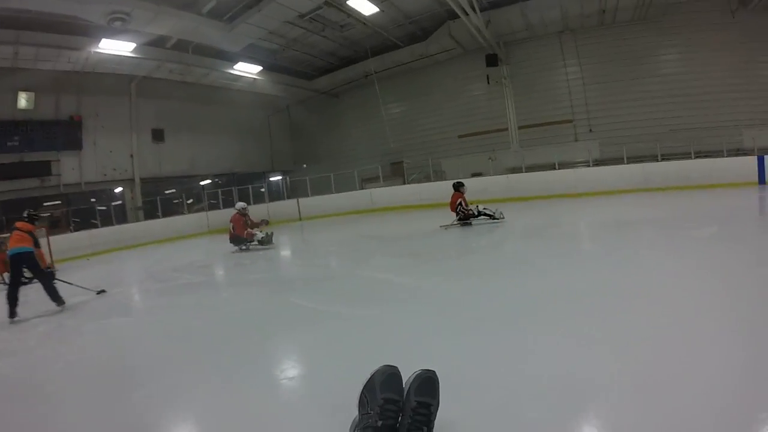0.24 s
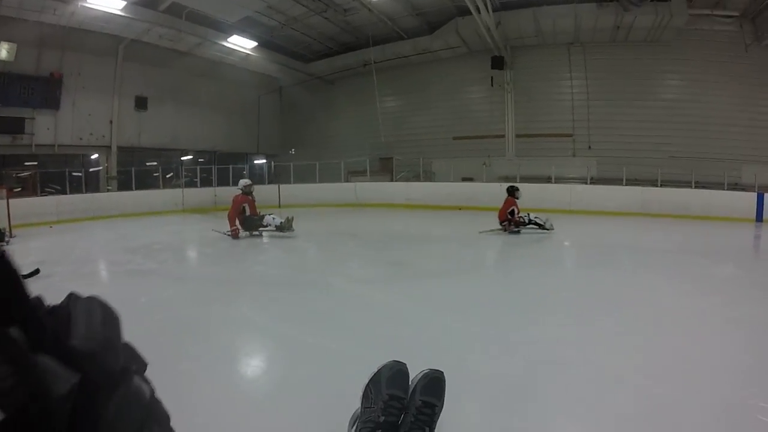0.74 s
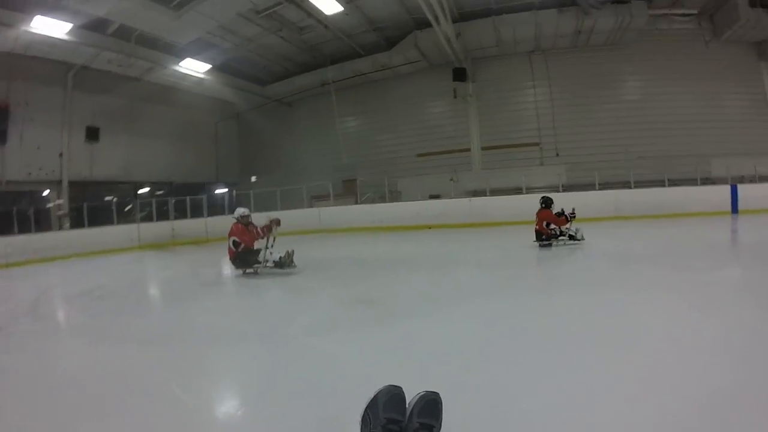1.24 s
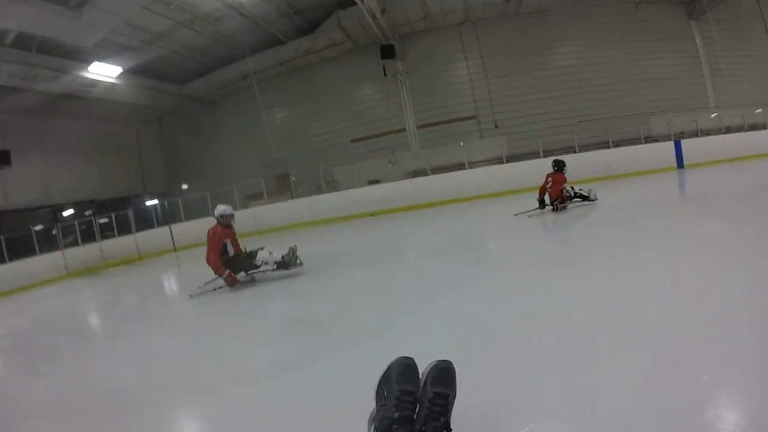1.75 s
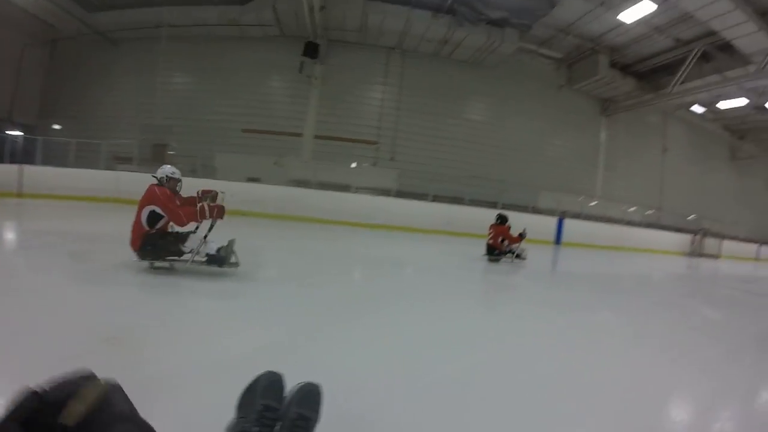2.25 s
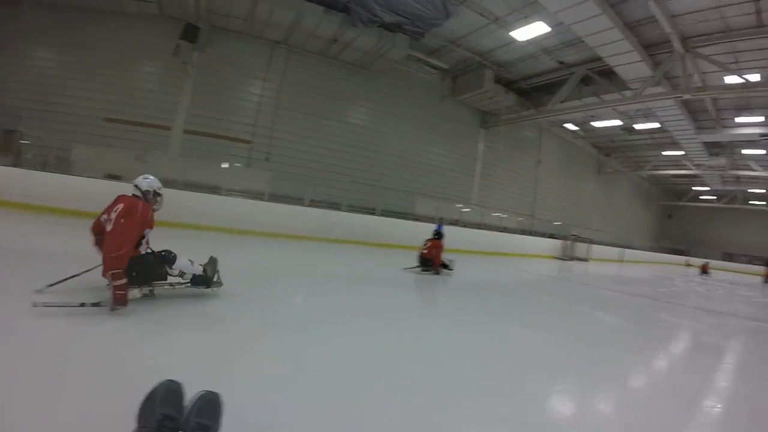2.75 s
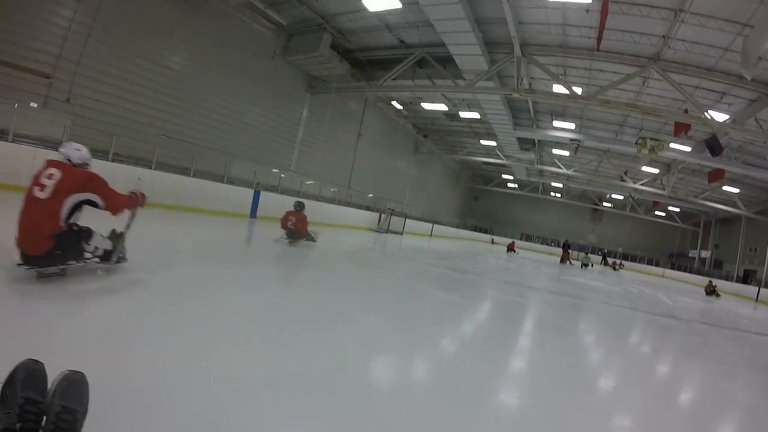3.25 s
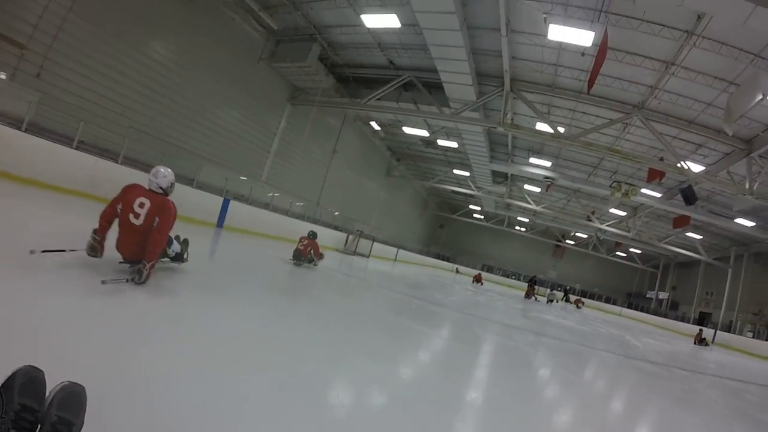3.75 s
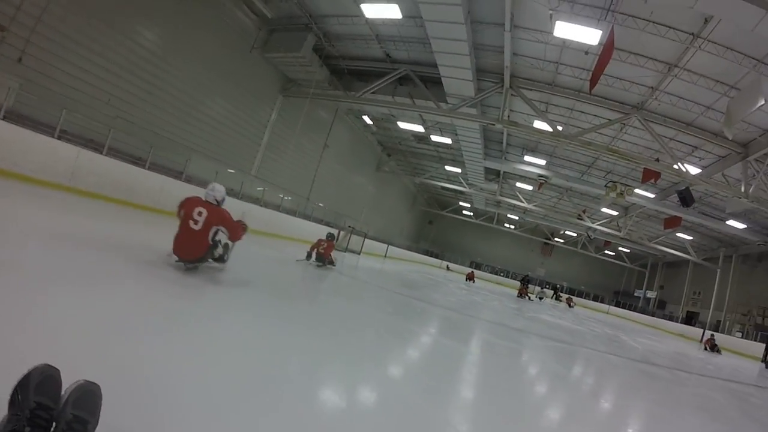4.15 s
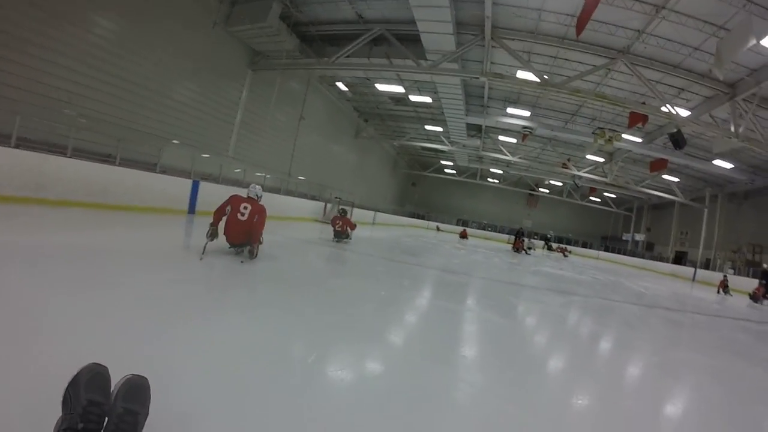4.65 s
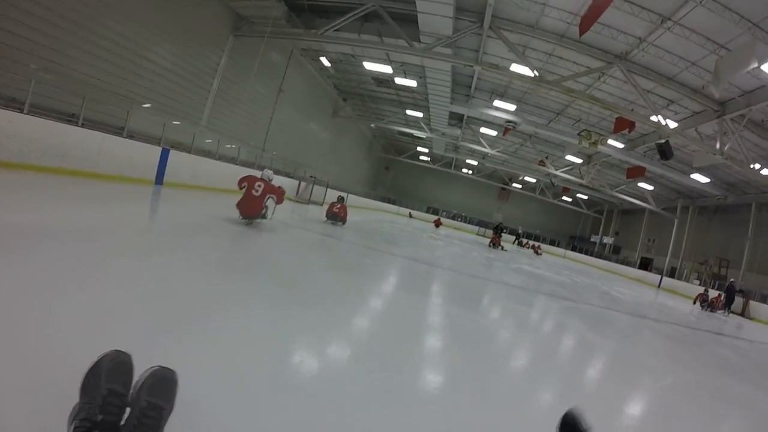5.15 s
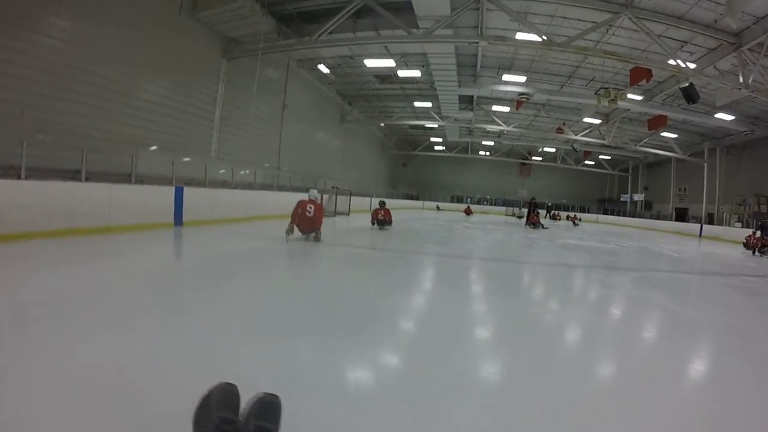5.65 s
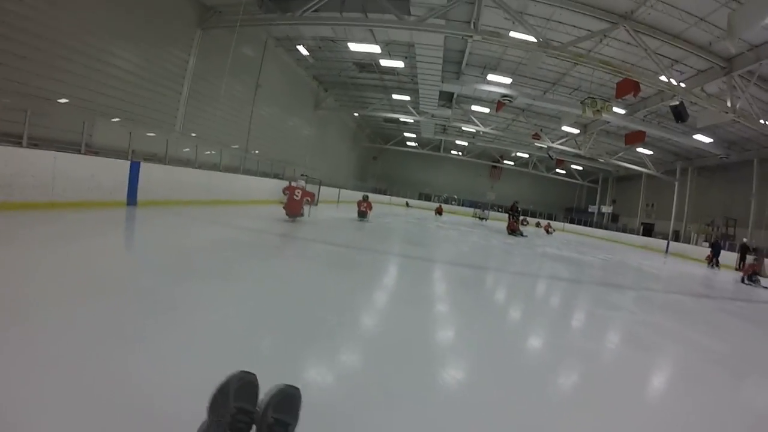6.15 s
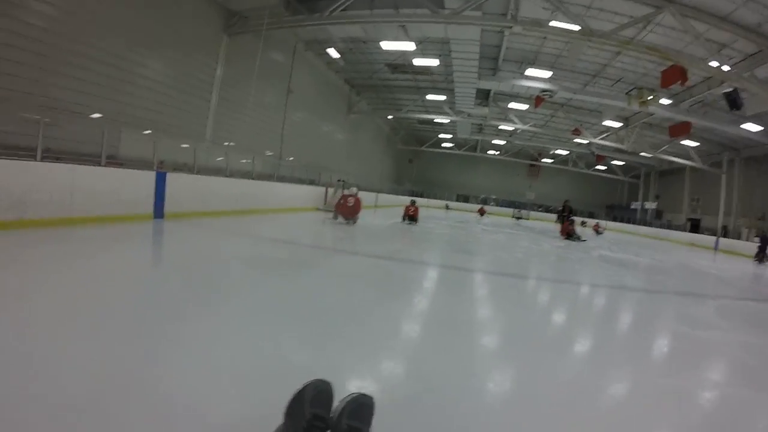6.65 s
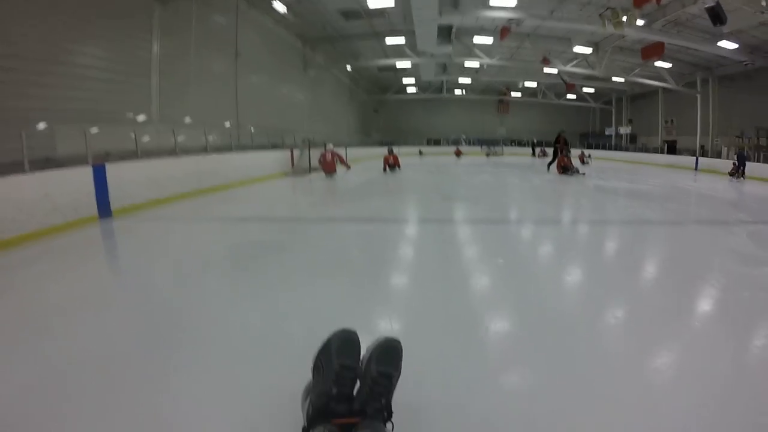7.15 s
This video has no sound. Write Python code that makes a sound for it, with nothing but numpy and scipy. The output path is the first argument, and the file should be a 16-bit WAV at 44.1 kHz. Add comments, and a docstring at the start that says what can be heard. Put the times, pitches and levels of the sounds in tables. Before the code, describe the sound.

From a hockey sled on indoor ice, blades hiss and scrape over a low shuddering rumble, with pick clicks, seat knocks and two heavy thumps.

```python
"""Hockey sled on indoor ice

Heard from the sled. Noise and random ice fractures, filtered, make the blades' hiss, crackle and scrape;
a wandering low sine makes the frame's shudder. Picks click and steel chips the ice as noise bursts in resonators;
the seat knocks and two heavy jolts thump as decaying sines. Shaped noise is the faint air of the hall,
and a decaying noise tail echoes the picks."""
import sys
import numpy as np
from scipy import signal
from scipy.fft import rfft, irfft
from scipy.io import wavfile
from scipy.ndimage import uniform_filter1d, map_coordinates

SR = 44100
rng = np.random.default_rng(int(sys.argv[2]) if len(sys.argv) > 2 else 0)


def store_wav(level_fs):
    """Save 16-bit WAV to argv[1]."""
    pcm = np.round(np.clip(np.atleast_2d(level_fs), -1, 1) * 32767)
    wavfile.write(sys.argv[1], SR, pcm.T.astype(np.int16))


N = 326340
TIME = np.arange(N) / SR  # seconds

# Steady coasting. Each row: time in seconds, glide level in dB, ice dust level in dB,
# mean sway level in dB.
COAST = [(0, -46, -52, -36), (.35, -53, -59.5, -39), (1.3, -48, -57, -34), (1.68, -52, -53.5, -40),
         (2.2, -51, -59, -34.5), (3.25, -47.5, -59, -40), (3.9, -49, -55, -31), (4.7, -44.5, -51.5, -37),
         (5.17, -48.5, -60, -44), (5.6, -45.5, -55, -36), (6.1, -44.5, -50, -30), (6.5, -44.5, -55.5, -36),
         (7.4, -51.5, -56, -41.5)]
# Strokes press the blades into the ice. Each row: start in seconds, hold end after start in seconds,
# glide level in dB, ice dust level in dB.
STROKES = [(0, 0.39, -51.5, -64), (0.607, 0.28, -78, -56.5), (0.963, 0.091, -43.5, -52.5),
           (1.451, 0.13, -53, -67), (1.694, 0.48, -49.5, -54), (2.376, 0.31, -62, -54),
           (2.75, 0.61, -51.5, -57), (3.456, 0.11, -45, -57), (3.787, 0.35, -45, -49.5),
           (4.402, 0.25, -51, -52), (5.281, 0.22, -61, -52.5), (5.705, 0.083, -43.5, -55),
           (5.995, 0.096, -42.5, -69), (6.848, 0.11, -54, -55.5), (7.241, 0.1, -49, -53.5)]
# Edges bite sideways and the skid runs out. Each row: start in seconds, rasp level in dB, t60 in seconds.
SKIDS = [(.97, -45.5, 0.37), (3.82, -50.5, 3.7), (4.45, -50, 1.7), (5.715, -47, 0.56), (6.03, -41.5, 4.7),
         (6.06, -43.5, 0.6)]
# Frame resonances. Each row: pitch in Hz, width in Hz, gain in dB.
FRAME_RINGS = [(1481, 186, 0), (1659, 210, -0.5), (2290, 174, -2), (2597, 170, -4), (3136, 340, -2.5),
               (4335, 194, -4), (5740, 1900, -30)]
# Filter shape of the ice dust. Each row: frequency in Hz, relative gain in dB.
SPRAY_COLOUR = [(2500, -1), (3900, -1.5), (4400, 9.5), (4900, -3.5), (5900, 4), (6700, -6.5), (7400, -10),
                (8000, -18), (10000, -19), (12000, -30.5), (15000, -78)]
# Filter shape of the sideways rasp. Each row: frequency in Hz, relative gain in dB.
SCRAPE_COLOUR = [(250, -3.5), (550, -5), (900, 1), (1250, -0.5), (1750, -2.5), (2400, 4.5), (3300, -9),
                 (5000, -16), (9000, -55)]
# Pitch of the frame's sway. Each row: time in seconds, mean pitch in Hz, rms wander in Hz.
SWAY_PITCH = [(0, 56.15, 3.77), (1.1, 51, 2.84), (3.1, 51.66, 2.8), (3.5, 50.23, 6.47), (5.1, 50.13, 7.1),
              (6.1, 40.44, 7.2), (6.6, 47.94, 6.9), (7.4, 44.4, 4.3)]
# Bumps set the frame swinging. Each row: start in seconds, hold end after start in seconds, sway level in dB.
BUMPS = [(0.147, 0.085, -27.5), (0.452, 0.13, -27), (0.682, 0.11, -25), (0.873, 0.064, -31),
         (0.988, 0.086, -19.5), (1.752, 0.053, -26), (1.9, 0.075, -32), (2.257, 0.05, -26),
         (2.513, 0.061, -26.5), (2.7, 0.12, -30), (2.902, 0.21, -26), (3.443, 0.028, -24.5),
         (3.93, 0.073, -28.5), (4.076, 0.035, -30), (4.34, 0.1, -29), (4.862, 0.029, -24),
         (5.028, .05, -27.5), (5.373, 0.062, -28.5), (5.75, 0.027, -30), (5.868, 0.024, -28),
         (6.556, 0.033, -30), (7.043, .04, -31)]
# Roughness of the ice under the runners. Each row: time in seconds, mean seat hum level in dB.
RUTS = [(0, -43.5), (1.2, -43.5), (3.6, -40.5), (3.85, -38.5), (4.15, -43.5), (5.2, -41.5), (5.5, -38),
        (6.1, -43), (7.4, -42.5)]
# Filter shape of the seat hum. Each row: frequency in Hz, relative gain in dB.
SEAT_HUM_COLOUR = [(12, 9.5), (28, 15.5), (45, 15), (75, 4), (105, -1), (180, -2), (260, -3.5),
                   (340, -14.5), (450, -11.5), (620, -15.5), (1200, -19.5), (3000, -48.5)]
# Filter shape of the hall air. Each row: frequency in Hz, relative gain in dB.
HALL_COLOUR = [(100, 7), (400, 0.5), (740, -15), (1100, -22), (2500, -36), (5000, -85), (8000, -23),
               (15000, -38.5)]
# Steel chips or shaves the ice. Each row: start in seconds, peak level in dB, resonator pitch in Hz,
# length in seconds.
CHIPS = [(0.139, -48, 6860, 0.0054), (0.6276, -39.5, 5900, 0.0043), (0.646, -46, 5900, .007),
         (.982, -39, 6200, .007), (1.085, -42.5, 5740, 0.0053), (1.160, -34, 5900, .013),
         (1.417, -43, 6350, 0.0055), (1.493, -51, 5870, 0.071), (1.755, -58, 7040, .15),
         (2.034, -47.5, 6700, 0.0087), (2.299, -47, 6000, 0.0068), (2.8, -48.5, 5840, 0.014),
         (3.056, -41.5, 6140, 0.0037), (3.403, -44.5, 6450, .006), (4.055, -40, 4700, .01),
         (4.262, -42, 5500, 0.016), (6.894, -37.5, 5100, 0.0025), (7.189, -42.5, 4525, 0.0026)]
# Knocks of seat and gear. Each row: start in seconds, thud level in dB, thud pitch in Hz, clack level in dB.
KNOCKS = [(0.289, -40.5, 179, -54), (0.446, -37.5, 266, -45), (0.49, -34, 168, -39.5),
          (.835, -41, 240, -44.5), (0.892, -32, 180, -46), (1.243, -32.5, 245, -33), (1.406, -36, 152, -42),
          (1.5437, -30, 260.5, -26.5), (1.557, -27.5, 103, -54), (1.574, -35, 109, -47),
          (1.634, -36, 240, -36.5), (2.117, -31, 134, -31), (2.374, -43, 163, -55),
          (2.463, -30.5, 215, -46), (2.829, -33, 212, -33.5), (2.964, -34.5, 219, -36),
          (3.264, -35.5, 182, -54), (3.762, -43, 263, -64), (3.813, -29.5, 210, -58), (3.86, -40, 235, -62),
          (4.276, -31.5, 177, -63), (4.462, -34, 166, -60), (5.394, -38.5, 176, -46),
          (5.509, -36.5, 164, -61), (5.918, -38, 220, -46), (6.36, -36.5, 192, -42),
          (6.536, -33.5, 175, -49), (6.594, -33, 151, -43), (6.71, -27, 259, -41),
          (6.7534, -32, 202, -33.5), (7.11, -37.5, 166, -59), (7.181, -42, 150, -58),
          (7.258, -38, 148, -45), (7.365, -33.5, 157, -49)]
# Damped resonances of the seat shell. Each row: pitch in Hz, width in Hz, gain in dB.
SEAT_RINGS = [(480, 160, 3.5), (685, 71, -11), (1400, 640, -8)]
# Picks and sticks strike. Each row: start in seconds, body level in dB before BODY_TRIM_DB,
# body pitch in Hz, body width in Hz, crunch time constant in seconds, steel edge level in dB.
CLICKS = [(0.31, -33.5, 1520, 900, 0.001, -48), (0.386, -30.5, 1500, 600, 0.0043, -55),
          (0.9652, -20, 1050, 1500, 0.001, -31), (2.148, -26, 1680, 280, 0.0036, -56),
          (2.402, -33.5, 2060, 1794, 0.0042, -39.5), (2.434, -38, 2230, 1200, 0.003, -38.5),
          (2.6245, -33.5, 1500, 500, 0.0013, -57), (3.1463, -37, 2800, 1400, 0.0014, -41.5),
          (3.442, -31, 1830, 1000, 0.0049, -46), (4.264, -32.5, 2216, 2204, 0.006, -35),
          (5.3544, -26.5, 1500, 380, 0.0016, -28.5), (5.392, -41, 3300, 1200, 0.0028, -38),
          (5.7, -33, 2700, 1190, 0.0024, -39), (5.733, -30.5, 2610, 1160, 0.0057, -44),
          (5.9985, -25.5, 2200, 1200, .0045, -44), (6.023, -26, 2452, 454, 0.003, -55),
          (6.053, -32.5, 1150, 900, .005, -51), (6.591, -33.5, 1620, 700, 0.003, -32.5),
          (6.615, -38, 2720, 1210, 0.0043, -38), (6.754, -39.5, 1800, 910, 0.0025, -60),
          (7.2504, -26.5, 2490, 900, 0.0028, -43), (7.27, -35, 2600, 1420, 0.0052, -34.5),
          (7.284, -28, 2630, 1410, 0.0021, -45), (7.307, -34, 1860, 1400, 0.0067, -48)]
# Heavy jolts. Each row: start in seconds, sway level in dB, sway t60 in seconds, thud level in dB,
# boom level in dB; levels are before the soft rise.
JOLTS = [(1.543, -13, 0.37, -9.5, -54), (6.707, -11.5, 0.47, -13, -2.5)]

STROKE_ATTACK_S, STROKE_T60_S = 0.048, 0.8
SKID_ATTACK_S, COAST_RASP_DB = 0.018, -7.5  # coasting rasp relative to the coasting glide
CHATTER_DB, CHATTER_RATE_HZ = 0.5, 55  # the edge grips and lets go
SQUEAL_HZ, SQUEAL_WIDTH_HZ, SQUEAL_DB = 2480, 260, -17.5  # level relative to the rasp
CRACKLE_PER_S, CRACKLE_DB = 70, -12.5  # nominal rate; level relative to glide, spray and rasp
BUMP_ATTACK_S, BUMP_T60_S, SWAY_FLUTTER_DB = 0.022, 0.18, 3.5
HALL_AIR_DB, HALL_T60_S, HALL_ECHO_DB = -56.5, 1.6, -12.0
BODY_TRIM_DB = -3.0
STEEL_HZ, STEEL_WIDTH_HZ = 4200, 400  # ring of the pick's tip
TICKS_PER_S, TICKS_DB, TICKS_T60_S = 540, -11, 0.034  # crumbs of ice that snap after a strike
JOLT_SWAY_HZ = 51
JOLT_THUD, JOLT_BOOM, JOLT_SHELL = (112, 0.07), (170, 0.12), (735, 0.082)  # (Hz, t60 in seconds)
CUTOFF_HZ = 14800


def from_db(db):
    """Amplitude factor of a level in dB."""
    return 10 ** (np.asarray(db) / 20)


def rms_one(x):
    """Scale to rms 1."""
    return x / np.sqrt(np.mean(x ** 2) + 1e-20)


def peak_one(x, size):
    """Scale so that the loudest stretch of size samples has rms 1."""
    return x / np.sqrt(uniform_filter1d(x ** 2, size).max() + 1e-20)


def in_time(rows):
    """Interpolate each column of a curve at every sample."""
    s, *columns = np.transpose(rows)
    return [np.interp(TIME, s, column) for column in columns]


def add(track, s, sound):
    """Mix a sound in at s seconds."""
    at = max(round(s * SR), 0)
    track[at:at + len(sound)] += sound[:N - at]


def coloured(x, points):
    """Filter a steady sound to a gain curve over log frequency; rms 1."""
    hz, db = np.transpose(points)
    bins_hz = np.maximum(np.fft.rfftfreq(N, 1 / SR), 1)
    gain = from_db(np.interp(np.log(bins_hz), np.log(hz), db))
    return rms_one(irfft(rfft(x) * gain, N))


def drift(rate_hz):
    """Slow random curve, low-passed noise of rms 1."""
    bins_hz = np.fft.rfftfreq(N, 1 / SR)
    return rms_one(irfft(rfft(rng.standard_normal(N)) / (1 + (bins_hz / rate_hz) ** 2), N))


def resonate(x, hz, width_hz):
    """Two-pole resonance with gain 1 on top."""
    r = np.exp(-np.pi * width_hz / SR)
    zeros = np.array([1, 0, -1]) * (1 - r * r) / 2
    poles = [1, -2 * r * np.cos(2 * np.pi * hz / SR), r * r]
    return signal.lfilter(zeros, poles, x)


def cut(x, hz, kind, order=2):
    """Butterworth low-pass or high-pass."""
    return signal.sosfilt(signal.butter(order, min(hz, SR / 2 - 100), kind, fs=SR, output="sos"), x)


def mode(t, hz, t60_s):
    """A struck mode: a sine that falls 60 dB in t60_s."""
    return np.sin(2 * np.pi * hz * t) * from_db(-60 * t / t60_s)


def swell(s, db, attack_s, hold_s, t60_s):
    """Power of one gesture: rises, holds until hold_s after its start, then decays."""
    t = TIME - s
    rise = np.clip(t / attack_s, 0, 1)
    decay = np.clip((t - hold_s) / t60_s, 0, 2)
    return (rise * from_db(db - 60 * decay)) ** 2


def wander(x, share, rate_hz):
    """Vary the reading speed of a steady sound, so its pitch drifts by an rms share of itself."""
    place = np.cumsum(1 + share * drift(rate_hz)) % N
    return map_coordinates(x, [place], order=3, mode="wrap")


def friction(per_s, spread_db, smooth_db):
    """Tiny ice fractures of random sign and size, over a smooth rub of white noise."""
    sizes = from_db(spread_db * np.minimum(rng.exponential(1, N), 4)) * rng.choice([-1, 1], N)
    fractures = sizes * (rng.random(N) < per_s / SR)
    return rms_one(fractures) + from_db(smooth_db) * rng.standard_normal(N)


def frame(x, waver_db=0):
    """Parallel frame resonances of alternating sign; waver_db makes each drift in level."""
    rings = [(-1) ** k * from_db(db) * resonate(x, hz, width_hz)
             for k, (hz, width_hz, db) in enumerate(FRAME_RINGS)]
    if waver_db:
        rings = [ring * from_db(waver_db * drift(4.9)) for ring in rings]
    return sum(rings)


def glide():
    """Runners rub on ice and sing through the frame; rms 1."""
    rub = friction(per_s=1100, spread_db=3.0, smooth_db=1.5)
    sung = wander(frame(rub, waver_db=1.5), share=0.02, rate_hz=6)
    return rms_one(cut(cut(sung, 1310, "high", order=4), 3410, "low", order=4))


def spray():
    """Ice dust thrown by the blades: coloured fracture noise; rms 1."""
    return coloured(friction(per_s=510, spread_db=6.5, smooth_db=9.5), SPRAY_COLOUR)


def scrape():
    """A sideways edge rasps, sings in a narrow resonance and chatters in level."""
    slips = friction(per_s=700, spread_db=2.0, smooth_db=1)
    squeal = rms_one(resonate(slips, SQUEAL_HZ, SQUEAL_WIDTH_HZ))
    squeal = wander(squeal, share=0.05, rate_hz=8)
    rasp = coloured(slips, SCRAPE_COLOUR)
    return (rasp + from_db(SQUEAL_DB) * squeal) * from_db(CHATTER_DB * drift(CHATTER_RATE_HZ))


def crackle(spread_db=5.0, cycles=7, low_hz=1400, high_hz=6500, clump_db=6, count=12):
    """Ice splinters snap in clumps, each impulse dealt to one of several resonators; rms 1."""
    per_s = CRACKLE_PER_S * from_db(clump_db * drift(17))
    sizes = from_db(spread_db * np.minimum(rng.exponential(1, N), 2)) * (rng.random(N) < per_s / SR)
    dealt = rng.integers(0, count, N)
    snaps = np.zeros(N)
    for k, hz in enumerate(np.geomspace(low_hz, high_hz, count)):
        hits = sizes * (dealt == k) + 1e-18  # offset avoids denormals
        snaps += resonate(hits, hz, hz / cycles) * low_hz / hz
    return rms_one(cut(snaps, high_hz, "low", order=4))


def blades():
    """Coasting, strokes and skids add in power and set the levels of the blade sounds."""
    glide_db, dust_db, _ = in_time(COAST)
    glide_power = from_db(glide_db) ** 2
    spray_power = from_db(dust_db) ** 2
    scrape_power = from_db(glide_db + COAST_RASP_DB) ** 2
    for s, hold_s, stroke_db, stroke_dust_db in STROKES:
        glide_power += swell(s, stroke_db, STROKE_ATTACK_S, hold_s, STROKE_T60_S)
        spray_power += swell(s, stroke_dust_db, STROKE_ATTACK_S, hold_s, STROKE_T60_S)
    for s, rasp_db, t60_s in SKIDS:
        scrape_power += swell(s, rasp_db, SKID_ATTACK_S, SKID_ATTACK_S, t60_s)
    bite = from_db(1.0 * drift(42))  # uneven ice
    rub = glide() * np.sqrt(glide_power) + spray() * np.sqrt(spray_power) + scrape() * np.sqrt(scrape_power)
    splinters = from_db(CRACKLE_DB) * crackle() * np.sqrt(glide_power + spray_power + scrape_power)
    return bite * rub + splinters


def shudder():
    """Bumps swell the frame's wandering low sine; sparse fractures patter softly through the seat."""
    _, _, coast_db = in_time(COAST)
    hz, wander_hz = in_time(SWAY_PITCH)
    hum_db, = in_time(RUTS)
    power = from_db(coast_db + SWAY_FLUTTER_DB * drift(13.4)) ** 2
    for s, hold_s, db in BUMPS:
        power += swell(s, db, BUMP_ATTACK_S, hold_s, BUMP_T60_S)
    sway = np.sin(2 * np.pi * np.cumsum(hz + wander_hz * drift(23.4)) / SR)
    hum = coloured(friction(per_s=30, spread_db=0.0, smooth_db=-2.0), SEAT_HUM_COLOUR)
    return sway * np.sqrt(power) + hum * from_db(hum_db + 0.98 * drift(1.6))


def hall_air():
    """Faint steady air of the big hall: coloured white noise."""
    return from_db(HALL_AIR_DB) * coloured(rng.standard_normal(N), HALL_COLOUR)


def chips(grit_db=-38, width_hz=700, top_ratio=0.91):
    """Steel slips on ice: a noise burst rings as a gritty chirp, or as a thin hiss when longer."""
    out, t = np.zeros(N), TIME[:SR // 2]
    for s, db, hz, length_s in CHIPS:
        slip = rng.standard_normal(len(t)) * np.exp(-(t / length_s) ** 4)
        chirp = cut(resonate(slip, hz, width_hz), hz * top_ratio, "low", order=4)
        chip = chirp + from_db(grit_db) * cut(slip, 2500, "high")
        add(out, s, from_db(db) * peak_one(chip, size=88))
    return out


def knocks(rub_db=-22, rub_s=0.0089, tail_db=-15, tail_s=0.025, thud_t60_s=0.11, pad_s=0.0025,
           flesh_db=-6, flesh_hz=120, shell_top_hz=1300):
    """A padded, ragged contact rings a low thud, shakes the seat broadly and clacks its damped shell."""
    out, t = np.zeros(N), TIME[:SR // 5]
    for s, thud_db, hz, clack_db in KNOCKS:
        rub_decay = np.exp(-t / rub_s) + from_db(tail_db) * np.exp(-t / tail_s)
        contact = from_db(rub_db) * rng.standard_normal(len(t)) * rub_decay
        contact[0] += 1
        flesh = peak_one(cut(resonate(contact, flesh_hz, flesh_hz), 2 * hz, "low"), size=220)
        pad_rise = 1 - np.exp(-(t / pad_s) ** 2)
        thud = (mode(t, hz, thud_t60_s) + from_db(flesh_db) * flesh) * pad_rise
        shell = sum(from_db(db) * resonate(contact, ring_hz, width_hz) for ring_hz, width_hz, db in SEAT_RINGS)
        clack = cut(shell, shell_top_hz, "low", order=4)
        add(out, s, from_db(thud_db) * peak_one(thud, size=220))
        add(out, s, from_db(clack_db) * peak_one(clack, size=130))
    return out


def picks(snap=6, frame_db=-15):
    """Snap, short crunch and after-ticks: the shaft gives the body, the steel tip a ringing edge."""
    out, t = np.zeros(N), TIME[:SR // 8]
    for s, body_db, hz, width_hz, crunch_s, steel_db in CLICKS:
        crunch = t / crunch_s * np.exp(1 - 2 * t / crunch_s) * 2
        ticks = (rng.random(len(t)) < TICKS_PER_S / SR) * np.sqrt(SR / TICKS_PER_S)
        ticks = ticks * rng.standard_normal(len(t)) * from_db(TICKS_DB - 60 * t / TICKS_T60_S)
        blow = rng.standard_normal(len(t)) * crunch + ticks
        blow[0] += snap
        body = resonate(blow, hz, width_hz) + from_db(frame_db) * frame(blow)
        body = cut(cut(body, 430, "high"), 2950, "low", order=4)
        edge = resonate(blow, STEEL_HZ, STEEL_WIDTH_HZ)
        edge = cut(cut(edge, 3400, "high"), 8000, "low", order=4)
        add(out, s, from_db(body_db + BODY_TRIM_DB) * peak_one(body, size=88))
        add(out, s, from_db(steel_db) * peak_one(edge, size=88))
    return out


def hall_echo(x):
    """Long, dull, diffuse tail of the rink: convolution with decaying low-passed noise of unit energy."""
    t = TIME[:2 * SR]
    tail = cut(rng.standard_normal(len(t)), 4100, "low")
    tail = tail * from_db(-60 * t / HALL_T60_S) * (1 - np.exp(-t / 0.028))
    return signal.fftconvolve(x, tail / np.sqrt(np.sum(tail ** 2)))[:N]


def jolts(rise_s=0.0064, shell_db=-34):
    """A soft heavy blow: thud, boom and faint shell ring die away while the sled sways on."""
    out, t = np.zeros(N), TIME[:SR // 2]
    for s, sway_db, sway_t60_s, thud_db, boom_db in JOLTS:
        swing = from_db(sway_db) * mode(t, JOLT_SWAY_HZ, sway_t60_s)
        swing -= from_db(thud_db) * mode(t, *JOLT_THUD)
        swing += from_db(boom_db) * mode(t, *JOLT_BOOM)
        swing += from_db(shell_db) * mode(t, *JOLT_SHELL)
        add(out, s, swing * (1 - np.exp(-(t / rise_s) ** 2)))
    return out


def scene():
    """The sled close by, the hall around it; only the picks feed the echo."""
    strikes = picks()
    sled = blades() + shudder() + chips() + knocks() + strikes + jolts()
    hall = hall_air() + from_db(HALL_ECHO_DB) * hall_echo(strikes)
    return (sled + hall)[None]


def record(dry):
    """Steep elliptic low-pass at CUTOFF_HZ."""
    return signal.sosfilt(signal.ellip(10, 0.1, 80, CUTOFF_HZ, fs=SR, output="sos"), dry)


dry = scene()
out = record(dry)
store_wav(out)
```